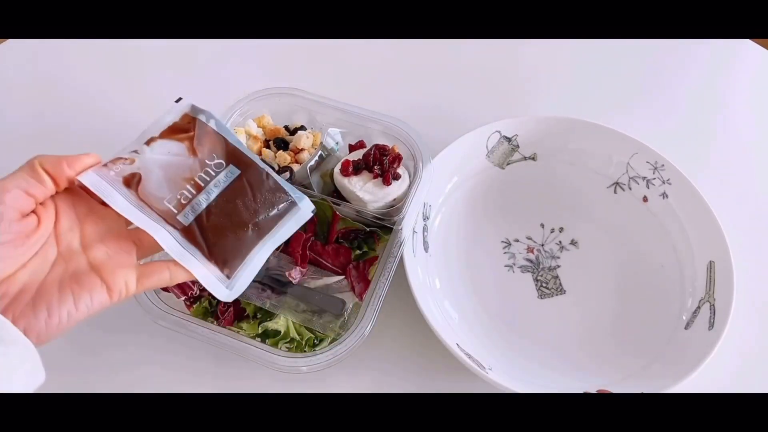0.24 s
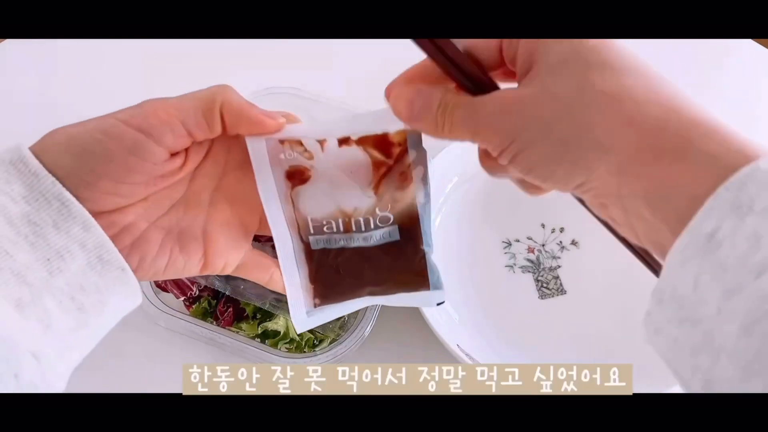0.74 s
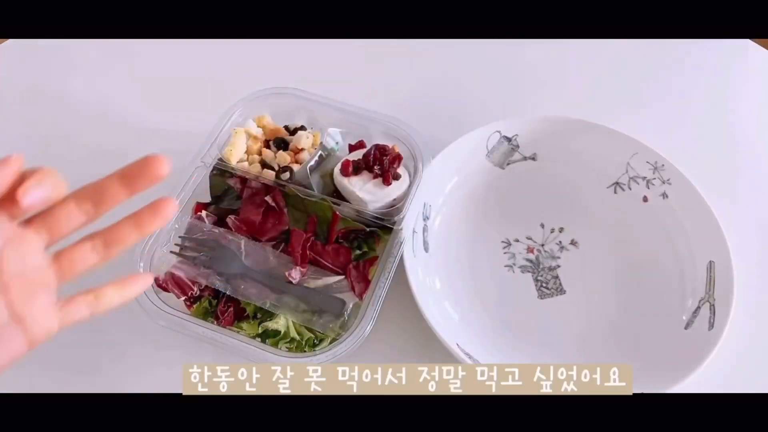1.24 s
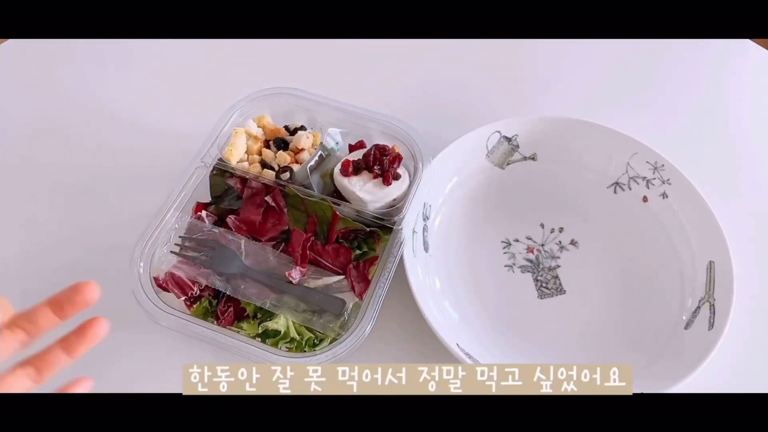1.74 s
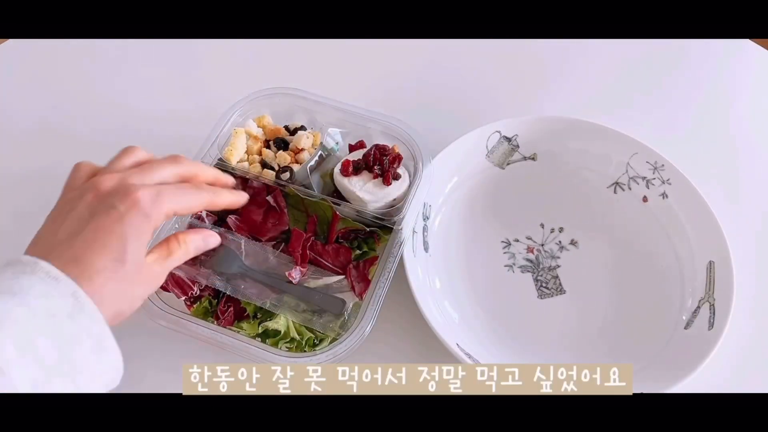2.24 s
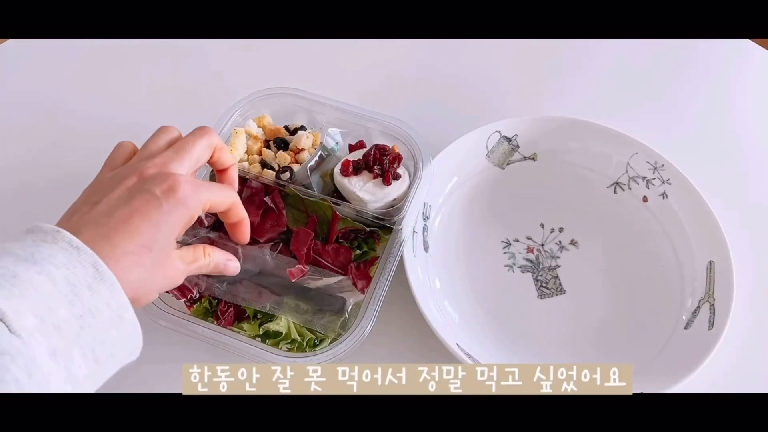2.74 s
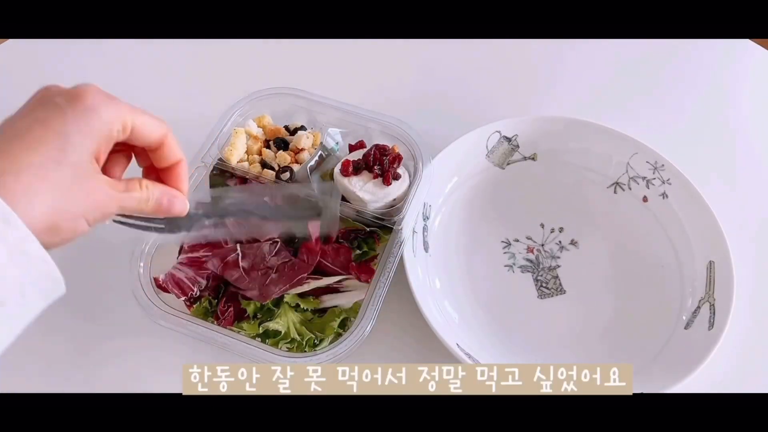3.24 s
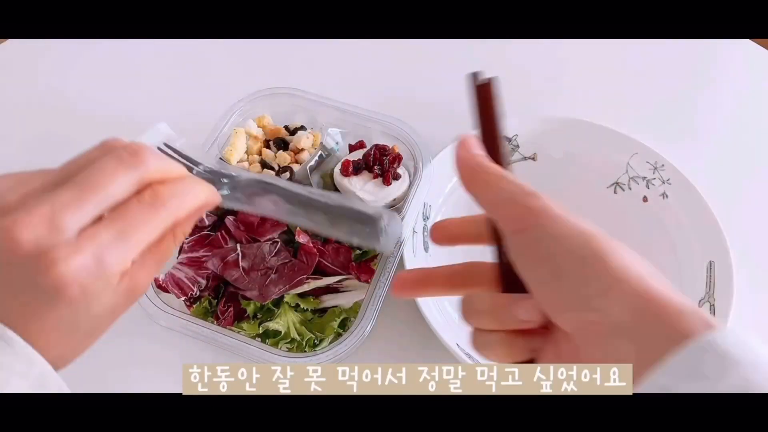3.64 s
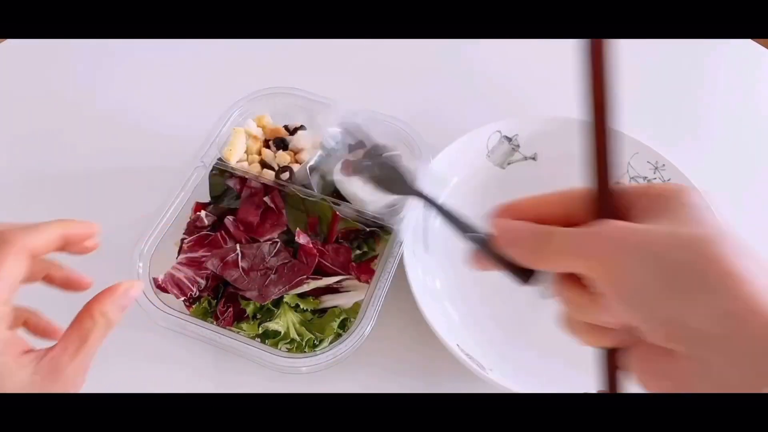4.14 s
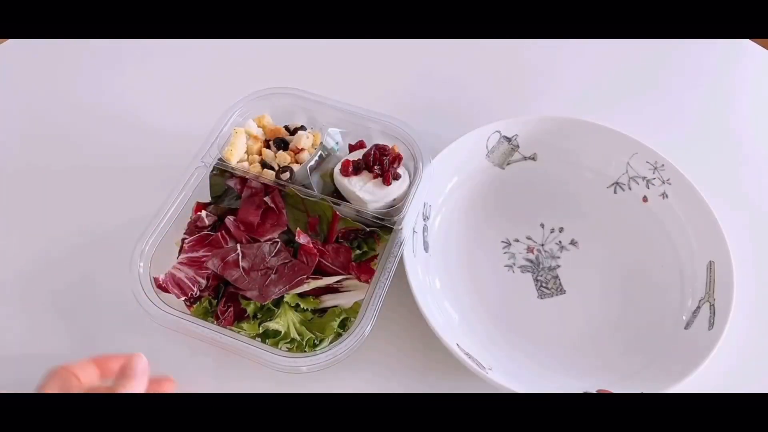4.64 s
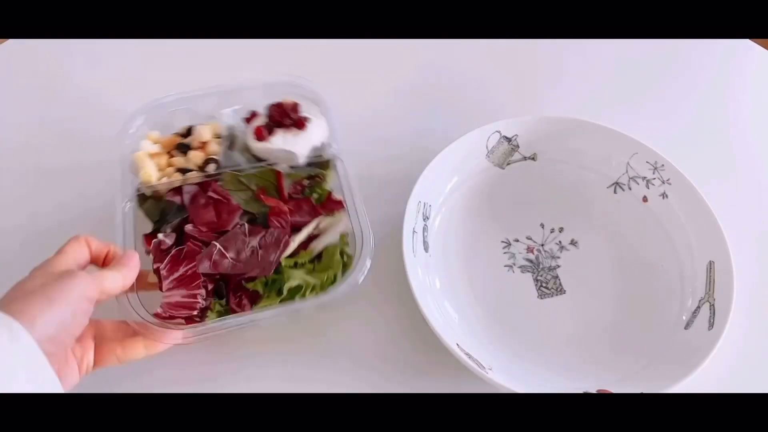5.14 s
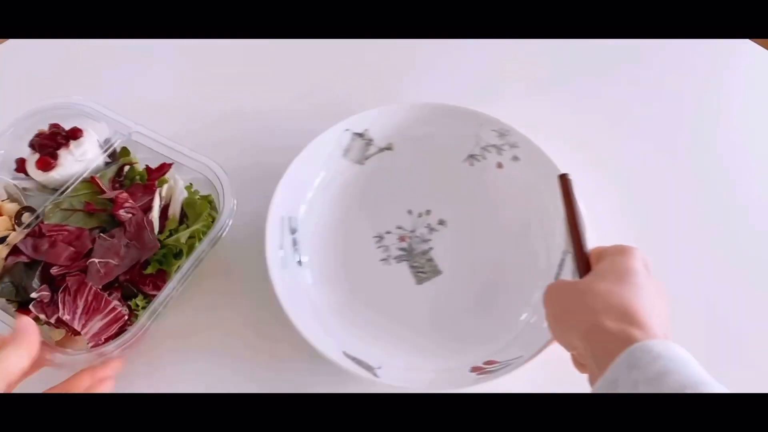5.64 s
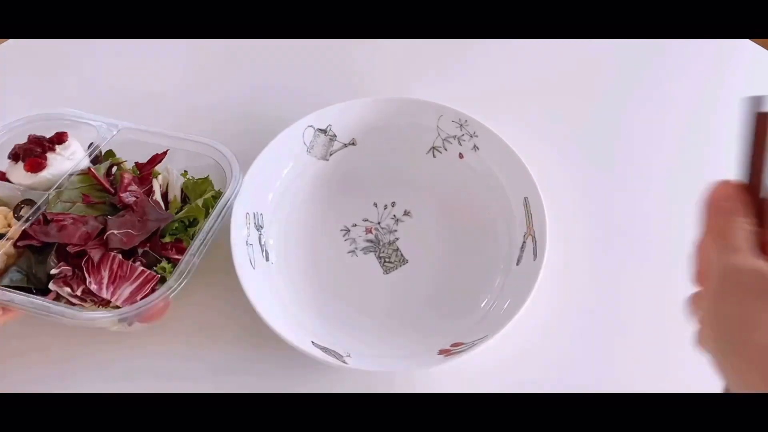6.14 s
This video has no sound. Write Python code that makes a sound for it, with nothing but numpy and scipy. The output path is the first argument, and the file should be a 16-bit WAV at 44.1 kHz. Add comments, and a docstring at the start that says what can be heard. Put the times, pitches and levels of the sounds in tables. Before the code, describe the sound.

In a quiet humming kitchen, faint sachet rustles lead to crisp wrapper crackling, a light tub slide, and a loud ceramic bowl scrape and clunk.

```python
"""Unpacking a salad on a kitchen table, close by, over the steady hum of a small room that answers each sound.
A sachet is brushed aside with dull pops; a fork's film wrapper crinkles (pitched snaps, swarms of creases).
The plastic tub is pushed away: it chatters, hisses (stick-slip, coloured grains) and ticks (ringing modes).
Meanwhile a ceramic bowl judders across the table (slips into bowl modes), is set down and rocks (knocks)."""
import sys
import numpy as np
from scipy import signal
from scipy.fft import rfft, irfft, next_fast_len
from scipy.io import wavfile
from scipy.ndimage import map_coordinates

SR = 44100
rng = np.random.default_rng(int(sys.argv[2]) if len(sys.argv) > 2 else 0)


def persist_wave(psi):
    """Save psi, clipped to +-1, as 16-bit WAV."""
    counts = np.round(np.clip(psi, -1, 1) * 32767).astype(np.int16)
    wavfile.write(sys.argv[1], SR, np.atleast_2d(counts).T)


N = 281799
TOP_HZ = 16000  # band limit

# wrapper held in the fingers: (from [s], to [s])
HELD_S = (2.4, 4.3)
EASE_S, EASE_DB_PER_S = 4.12, 17  # the grip loosens from here on

# film sheet, lower spectrum: (frequency [Hz], level [dB])
FILM_BODY = [(200, -41), (600, 3.5), (1200, -7.5), (2000, -0.5), (4000, -6), (6000, -7), (10000, -32)]
# bowl standing on the table, modes: (frequency [Hz], level [dB], t60 [s])
BOWL = [(199.6, -15.5, .22), (262, -9.5, .09), (289.6, -1.5, 0.14), (344, -12.5, .09), (414.4, -15.5, 0.18),
        (485, -18, 0.091), (529.3, -.5, 0.14), (568.4, -.5, .12), (693.5, -5, 0.2), (757, -6.5, 0.095),
        (861, -29, 0.1), (927, -12, .1), (1071, -5.5, 0.1), (1258, -15.5, .11), (1388, -4.5, 0.099),
        (1500, -1.5, 0.067), (1622, -5.5, .1), (1730, -6, 0.049), (1958, -6.5, .07), (2460, -13, 0.049),
        (2720, -17, .1)]
# thin glazed bowl wall, modes: (frequency [Hz], level [dB], t60 [s])
RIM = [(3180, 9.5, 0.079), (3280, 4, .03), (5520, 12.5, 0.046), (5675, 4, 0.057), (8700, 6.5, 0.036),
       (8840, 7.5, 0.06), (9450, 0, .035), (11200, -7, .025), (13280, 2, .035), (14300, -7, .03)]
# table top, spectrum: (frequency [Hz], level [dB])
THUD = [(30, -42), (100, -18.5), (250, -4), (600, 2.5), (1200, -5), (1700, -6), (2600, -14), (5000, -23),
        (9000, -28), (16000, -22)]


def amp(db):
    """Decibels to gain."""
    return 10 ** (np.asarray(db) / 20)


def unit(x):
    """Scale to rms 1."""
    return x / np.sqrt(np.mean(x ** 2) + 1e-20)


def along(points, hz):
    """Interpolate (Hz, value) points on a log frequency axis."""
    f, v = np.transpose(points)
    return np.interp(np.log(hz + 1), np.log(f), v)


def fade(t, t60):
    """Exponential decay by 60 dB in t60."""
    return np.exp(-np.log(1000) * t / t60)


def coloured(x, spectrum):
    """Shape x by a spectrum, at rms 1."""
    gain = amp(along(spectrum, np.fft.rfftfreq(len(x), 1 / SR)))
    return unit(irfft(rfft(x) * gain, len(x)))


def passed(x, hz, kind):
    """Two-pole low-pass or high-pass."""
    return signal.sosfilt(signal.butter(2, hz, kind, fs=SR, output="sos"), x)


def add(track, s, x):
    """Mix x into the track at time s."""
    part = track[max(round(s * SR), 0):][:len(x)]
    part += x[:len(part)]


def struck(x, db, window_s):
    """Scale a hit so that its first moments have this rms level."""
    onset = x[:max(round(window_s * SR), 8)]
    return amp(db) * x / np.sqrt(np.mean(onset ** 2))


def stroke(s, rise_s, length_s, t60):
    """Envelope of one movement: linear rise, hold until its length is over, exponential release."""
    age = np.arange(N) / SR - s
    return np.clip(age / rise_s, 0, 1) * fade(np.clip(age - length_s, 0, 3 * t60), t60)


def wobble(rate):
    """Smooth random curve, rate knots a second."""
    return map_coordinates(rng.standard_normal(4000), [np.arange(N) * rate / SR], mode="mirror")


def ring(modes, scatter_db=0):
    """Half a second of damped modes of alternating sign, their strengths scattered at random."""
    t = np.arange(SR // 2) / SR
    out = np.zeros(len(t))
    for k, (hz, db, t60) in enumerate(modes):
        strength = amp(db + scatter_db * rng.standard_normal())
        out += (-1) ** k * strength * np.sin(2 * np.pi * hz * t) * fade(t, t60)
    return out


def grains(per_s, spread_db, smooth):
    """Tiny impulses of uneven size over a share of plain noise."""
    sizes = amp(spread_db * np.clip(rng.standard_normal(N), -2, 2)) * rng.choice([-1, 1], N)
    return unit(sizes * (rng.random(N) < per_s / SR)) + smooth * rng.standard_normal(N)


def slips(per_s, jitter, spread_db, count=3000):
    """Stick-slip: one impulse each time the contact lets go; jitter in periods."""
    at = np.flatnonzero(np.diff(np.floor(np.cumsum(per_s) / SR)))[:count]
    chance = rng.standard_normal((count, 2))[:len(at)]
    at = np.clip(at + jitter * chance[:, 0] * SR / per_s[at], 0, N - 1).astype(int)
    return np.bincount(at, amp(spread_db * chance[:, 1]), N)


def creases(count, centre_hz, octaves, spread_db, life_cycles=9):
    """A swarm of tiny snaps, each a short decaying sine with its own pitch and size."""
    t = np.arange(160) / SR
    chance = rng.standard_normal((count, 2))
    hz = np.minimum(centre_hz * 2 ** (octaves * chance[:, :1]), TOP_HZ)
    size = amp(spread_db * np.clip(chance[:, 1:], -2, 2)) * np.sqrt(hz)
    waves = size * np.sin(2 * np.pi * hz * t) * fade(t * hz, life_cycles)
    at = rng.integers(0, N, (count, 1)) + np.arange(len(t))
    return unit(np.bincount(at.ravel(), waves.ravel(), N)[:N])


def small_snaps(count=20):
    """Small creases flip at random while the wrapper is held: rows (s, dB, Hz)."""
    start, end = HELD_S
    when = start + (end - start) * (np.arange(count) + rng.random(count)) / count
    size, pitch = np.clip(rng.standard_normal((count, 2)), -2, 2).T
    eased_db = EASE_DB_PER_S * np.maximum(when - EASE_S, 0)
    level_db = -57.5 + 4 * size - eased_db
    hz = 2770 * 2 ** (0.48 * pitch)
    return list(zip(when, level_db, hz))


def snaps():
    """A crease flips: a sharp crack, a few cycles of the patch around it and a faint flutter of the sheet."""
    # distinct creases of sachet and wrapper film: (time [s], nominal level [dB], patch pitch [Hz])
    snap_events = [(1.4675, -48, 4100), (1.7093, -57, 4500), (2.295, -54, 1700), (2.3583, -48, 2000),
                   (2.4573, -43.5, 2100), (2.4684, -49.5, 3620), (2.5773, -47.5, 4800), (2.6814, -47, 2410),
                   (2.7769, -39.5, 4900), (2.7947, -38, 4000), (2.8038, -48.5, 2510), (2.8309, -38, 4230),
                   (2.989, -45.5, 2100), (2.9953, -45, 3600), (3.0519, -50, 3700), (3.081, -45, 1970),
                   (3.1162, -55, 1610), (3.1687, -45, 1880), (3.18, -50.5, 4960), (3.2436, -54, 5350),
                   (3.2659, -45, 4700), (3.278, -51, 4930), (3.3811, -41, 4760), (3.4434, -48.5, 4000),
                   (3.5175, -47, 3900), (3.6557, -44, 5400), (3.6933, -49, 1630), (3.7626, -46, 2730),
                   (3.8289, -35.5, 5370), (3.8407, -45, 4820), (3.864, -38.5, 4800), (3.891, -50, 3600),
                   (3.9478, -44.5, 2650), (4.013, -47, 3800), (4.0339, -57, 1430), (4.1971, -53.5, 3400),
                   (4.323, -41.5, 4600), (4.343, -48, 5000), (4.3918, -55.5, 4470), (4.523, -42.5, 4140),
                   (4.5964, -43, 4240)]
    # thicker walls of sachet and tub popping dully: (time [s], body level [dB], pitch [Hz])
    pop_events = [(0.9597, -44.5, 1820), (0.961, -45.5, 3800), (1.168, -60, 3550), (1.696, -59, 3700),
                  (1.7753, -53, 3850), (2.7852, -42.5, 2530), (4.8467, -44, 1520), (4.8876, -43, 1470),
                  (4.929, -53, 2700)]
    crack_db, body_db, pop_crack_db = 2, -52, -9
    usual_db, body_grows = -47, 0.66  # harder snaps gain more crack than body (dB of body per dB)
    crack_t60, push_t60, flutter_t60, life_cycles = 0.0015, 0.006, 0.038, 13
    breadth, flutter = 0.3, 0.16  # gains

    thin = [(s, db + crack_db, body_db + body_grows * (db - usual_db), hz)
            for s, db, hz in list(snap_events) + small_snaps()]
    thick = [(s, db + pop_crack_db, db, hz) for s, db, hz in pop_events]
    out, t = np.zeros(N), np.arange(SR // 20) / SR
    sheet = flutter * fade(t, flutter_t60)
    for s, high_db, low_db, hz in thin + thick:
        noise = rng.standard_normal((2, len(t)))
        crack = passed(noise[0] * (fade(t, crack_t60) + sheet), 5840, "high")
        patch = np.sin(2 * np.pi * hz * t) * fade(t, life_cycles / hz)
        body = patch + breadth * coloured(noise[1], FILM_BODY) * (fade(t, push_t60) + sheet)
        add(out, s, struck(crack, high_db, .0025) + struck(body, low_db, .0025))
    return out


def rustle():
    """Each rub sets off clumps of tiny creases over a fine hiss; a few keep ticking while the wrapper is gripped."""
    # hands rubbing sachet, wrapper and tub: (time [s], length [s], nominal level [dB], body against fizz [dB])
    rubs = [(0.009, 0.052, -61, -8), (0.06, 0.11, -72.5, 5), (0.755, 0.1, -70.5, 2.5),
            (0.929, 0.04, -59.5, 0.5), (1.002, 0.018, -67, 9.5), (1.439, 0.06, -54, -7),
            (1.502, 0.078, -65, -16), (2.279, 0.035, -69.5, 9), (2.45, 0.066, -55.5, -2.5),
            (2.54, 0.14, -62.5, -1.5), (2.766, 0.043, -53, 0.5), (2.823, 0.057, -66.5, 3),
            (2.916, 0.18, -60, -1.5), (3.139, 0.042, -54.5, -7), (3.225, 0.095, -66, -8),
            (3.351, 0.054, -56, 1.5), (3.744, 0.029, -54, 2.5), (3.81, 0.1, -60.5, -0.5),
            (3.93, 0.032, -54, 0), (4.478, 0.14, -58, -9), (4.834, 0.027, -57.5, 8),
            (4.869, 0.068, -63, 6.5), (6.034, 0.21, -71, 4), (6.312, 0.071, -59.5, 6)]
    # fine hiss: (frequency [Hz], level [dB])
    fizz_spectrum = [(2500, -33), (5000, 3), (8000, -4), (12000, 6.5), (15500, -7), (17000, -8)]
    rise_s, release_t60 = 0.014, 0.043
    fizz_db, body_db, smooth = -4.5, -3, 0.66  # smooth: gain of the plain hiss
    held_db, held_rise_s, held_t60 = -67, 0.99, 0.42
    clumps_per_s, clump_db = 110, 3.0

    fizz = creases(count=6000, centre_hz=10500, octaves=.4, spread_db=5)
    fizz += smooth * coloured(rng.standard_normal(N), fizz_spectrum)
    body = creases(count=3000, centre_hz=2930, octaves=0.64, spread_db=2)
    body += smooth * coloured(rng.standard_normal(N), FILM_BODY)
    start = HELD_S[0]
    grip = amp(held_db) * stroke(start, held_rise_s, EASE_S - start, held_t60)
    out = grip * creases(count=900, centre_hz=5000, octaves=0.85, spread_db=4)
    for s, length_s, db, weight_db in rubs:
        rub = amp(fizz_db) * fizz + amp(body_db + weight_db) * body
        out += amp(db) * stroke(s, rise_s, length_s, release_t60) * rub
    return out * amp(clump_db * wobble(clumps_per_s))


def bowl_knocks():
    """The bowl lands on one edge, drops flat and rocks; softer contacts reach mostly the low modes."""
    # the bowl's foot landing: (time [s], nominal level [dB], contact hardness as low-pass cutoff [Hz])
    knocks = [(5.6227, -42.5, 7000), (5.7207, -18, 645), (5.7435, -17, 3930), (5.7509, -20.5, 1400),
              (5.7960, -24.5, 600), (5.8768, -17.5, 625), (5.8814, -31, 575), (5.9200, -32.5, 694),
              (5.9740, -47, 550)]
    thud, thud_t60, clack, clack_t60 = 0.84, 0.11, 1.3, 0.02
    rim_db, rim_grows, level_db = -23.0, 0.89, -4.5

    out, t = np.zeros(N), np.arange(SR // 2) / SR
    hardest_hz = max(hz for s, db, hz in knocks)
    # the table top answers with a brief clack and a longer dull thud
    table_decay = thud * fade(t, thud_t60) + clack * fade(t, clack_t60)
    for s, db, hardness_hz in knocks:
        table = coloured(rng.standard_normal(len(t)), THUD) * table_decay
        rim = amp(rim_db) * (hardness_hz / hardest_hz) ** rim_grows * ring(RIM, scatter_db=3)
        body = passed(ring(BOWL, scatter_db=1.5) + table, hardness_hz, "low")
        add(out, s, amp(db + level_db) * (body + rim))
    return passed(out, 100, "high")


def bowl_drag():
    """The foot ring sticks and slips, shaking bowl and table; its unglazed edge grinds and sets the wall singing."""
    # pull on the bowl: (time [s], strength [dB])
    pull = [(5.33, -68.5), (5.392, -32.5), (5.42, -30), (5.468, -29.5), (5.476, -36), (5.508, -32.5),
            (5.6, -62)]
    # table shaken by the slips: (frequency [Hz], level [dB])
    rumble_spectrum = [(60, -41), (160, -19), (260, -8), (350, -5.5), (470, -5.5), (800, -16.5),
                       (3000, -61)]
    usual_db, judder_db, rumble_db, grit_db = -32, -2, -5, -7  # the last three against the pull
    grit_grows = 0.68  # grit follows the pull less steeply than the judder (dB per dB)
    slips_per_s, slips_double_db = 137, 60  # rate at the usual pull; extra pull that doubles it
    glide_s, glide_t60 = 5.465, 0.086  # the foot stops catching: the judder dies, the rumble follows the pull
    sink_s, sink_length_s = 5.39, 0.084  # the rumble deepens as the bowl's weight settles
    singing_db, singing_grows = -15.5, 1.03  # the wall sings mainly under a firm pull
    waver_db, wavers_per_s = 3.5, 45

    now_s = np.arange(N) / SR
    times_s, strength_db = np.transpose(pull)
    pull_db = np.interp(now_s, times_s, strength_db, left=-120, right=-120) - usual_db
    per_s = slips_per_s * 2 ** (pull_db / slips_double_db)
    catching = fade(np.clip(now_s - glide_s, 0, 1), glide_t60)
    body = ring(BOWL)

    jerks = slips(per_s, jitter=0.069, spread_db=3.5)
    judder = passed(signal.fftconvolve(jerks, body)[:N], 750, "low")
    judder = unit(passed(judder, 480, "high"))

    rumble = coloured(slips(2 * per_s, jitter=0.23, spread_db=3.0), rumble_spectrum)
    thin_rumble = unit(passed(rumble, 380, "high"))
    settled = np.clip((now_s - sink_s) / sink_length_s, 0, 1)
    rumble = settled * rumble + (1 - settled) * thin_rumble

    grind = grains(per_s=1200, spread_db=3, smooth=.4)
    scrape = unit(signal.fftconvolve(grind, body)[:N]) + coloured(grind, THUD)
    scrape = unit(passed(passed(scrape, 1150, "high"), 7000, "low"))

    wall_db = singing_db + singing_grows * pull_db + waver_db * wobble(wavers_per_s)
    singing = amp(wall_db) * unit(signal.fftconvolve(grind, ring(RIM))[:N])

    # level judder and rumble over the drag alone
    moving = slice(round(times_s[0] * SR), round(times_s[-1] * SR))
    shake = amp(judder_db) * catching * judder / judder[moving].std()
    shake += amp(rumble_db) * rumble / rumble[moving].std()
    return amp(usual_db) * (amp(pull_db) * shake + amp(grit_db + grit_grows * pull_db) * scrape + singing)


def tub_slide():
    """The light tub, pushed once, chatters until it runs freely and hisses along the table until it stops."""
    # tub on table, hiss: (frequency [Hz], level [dB])
    hiss_spectrum = [(410, -7), (700, -5), (1230, -12), (1580, -5.5), (1800, -1.5), (3460, -6.5),
                     (3640, -2), (6400, -1), (9860, -13), (15000, -17), (16000, -19)]
    # tub wall, modes: (frequency [Hz], level [dB], t60 [s])
    wall_modes = [(1524, 3.5, 0.02), (1800, -6.5, 0.032), (2600, 2, 0.0029), (4500, -36, .005)]
    # the tub's foot drags harder for a moment: (time [s], length [s], level [dB])
    scuffs = [(5.304, .012, -51), (5.596, 0.025, -56.5)]
    slide_s, slide_db, chatter_db = 5.0, -51, -51
    build_db, build_s = 6, 0.14  # the hiss builds as the tub gains speed
    running_chatter_db = -10.5  # chatter left under the hiss, against it

    speed = np.clip((np.arange(N) / SR - slide_s) / build_s, 0, 1)
    running = amp(slide_db - build_db * (1 - speed)) * stroke(slide_s, rise_s=0.051, length_s=.25, t60=1.16)
    scuffing = sum(amp(db) * stroke(s, .012, length_s, 0.16) for s, length_s, db in scuffs)
    starting = amp(chatter_db) * stroke(5.02, rise_s=0.015, length_s=0.04, t60=0.17)
    hiss = coloured(grains(per_s=5100, spread_db=5, smooth=0.57), hiss_spectrum)
    catches = slips(np.full(N, 125), jitter=0.189, spread_db=2)
    chatter = unit(signal.fftconvolve(catches, ring(wall_modes))[:N])
    chatter_level = starting + amp(running_chatter_db) * running
    return passed((running + scuffing) * hiss + chatter_level * chatter, 550, "high")


def ticks():
    """Stiff plastic scuffs for a few milliseconds and rings high, a little differently at each spot."""
    # fork and tub clicking: (time [s], level [dB], scuff t60 [s])
    clicks = [(3.496, -31, .022), (3.504, -34, .016), (3.529, -42, .014), (5.1788, -36, .007),
              (5.6238, -54, .005), (6.2675, -40, .012), (6.3226, -35, .018)]
    # stiff plastic, modes before detuning: (frequency [Hz], level [dB], t60 [s])
    plastic = [(3640, -19, 0.026), (5860, -5, .004), (8520, -1, 0.014), (9230, -2, 0.0058),
               (11500, 4.5, 0.012), (12940, 7.5, .005), (14300, 3.5, .006), (14800, 8, .005)]
    crack, detune = 0.53, 0.023  # scuff gain; largest relative shift of a mode

    out, t = np.zeros(N), np.arange(SR // 10) / SR
    for s, db, scuff_t60 in clicks:
        scuff = passed(rng.standard_normal(len(t)) * fade(t, scuff_t60), 2950, "high")
        detuned = [(hz * (1 + detune * rng.uniform(-0.94, 1)), mode_db, t60) for hz, mode_db, t60 in plastic]
        ringing = signal.fftconvolve(scuff, ring(detuned, scatter_db=0.5))[:len(t)]
        add(out, s, struck(unit(ringing) + crack * unit(scuff), db, .005))
    return out


def brush():
    """Faint, smooth rubbing as the sachet is moved: coloured noise under slow releases."""
    # hand and sachet: (time [s], length [s], level [dB])
    brushes = [(0, 0.095, -67.5), (1.743, 0.017, -65)]
    # rubbing noise: (frequency [Hz], level [dB])
    brush_spectrum = [(1500, -23), (3200, -10), (4300, 4), (5500, -13), (9000, -23)]
    level = sum(amp(db) * stroke(s, 0.0083, length_s, .45) for s, length_s, db in brushes)
    return level * coloured(rng.standard_normal(N), brush_spectrum)


def room(x, wet_db, delay_s=.006):
    """The kitchen's answer: a noise tail whose decay time varies with frequency."""
    # kitchen reverberation: (frequency [Hz], t60 [s])
    kitchen = [(150, 0.28), (600, 0.32), (2000, 0.4), (6000, 0.39), (15000, 0.31)]
    hz, t, z = signal.stft(rng.standard_normal(SR // 2), SR, nperseg=256)
    decay_db = -60 * t / along(kitchen, hz)[:, None]
    tail = signal.istft(z * amp(decay_db), SR, nperseg=256)[1]
    tail = np.pad(tail / np.linalg.norm(tail), (round(delay_s * SR), 0))
    return x + amp(wet_db) * signal.fftconvolve(x, tail)[:N]


def room_hum():
    """Steady background: noise weighted to the low frequencies."""
    # hum of the room: (frequency [Hz], level [dB])
    hum_spectrum = [(24, -52), (40, -33), (66, -4), (109, -0.5), (167, -9), (209, -12), (256, -8.5),
                    (433, -13.5), (503, -14), (770, -17.5), (942, -21.5), (4800, -33.5), (14500, -41.5),
                    (16000, -43)]
    return amp(-58.5) * coloured(rng.standard_normal(N), hum_spectrum)


def scene():
    """Sachet, wrapper, tub and bowl in the room, over its hum."""
    film = room(snaps() + rustle() + brush(), wet_db=-11.0)
    bowl = room(bowl_drag(), wet_db=-11) + room(bowl_knocks(), wet_db=-6.5)
    tub = room(ticks() + tub_slide(), wet_db=-9)
    return (film + bowl + tub + room_hum())[None]


def record(dry):
    """Nothing is kept above the band limit."""
    m = next_fast_len(N + SR // 2)
    kept = np.fft.rfftfreq(m, 1 / SR) < TOP_HZ
    return irfft(rfft(dry, m) * kept, m)[..., :N]


dry = scene()
out = record(dry)
persist_wave(out)
```